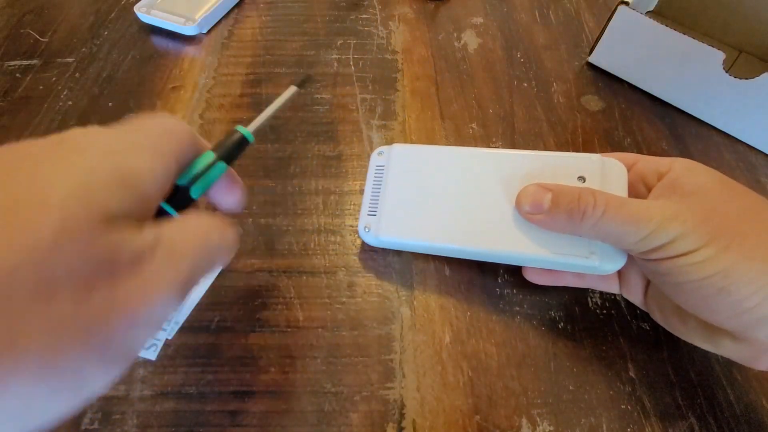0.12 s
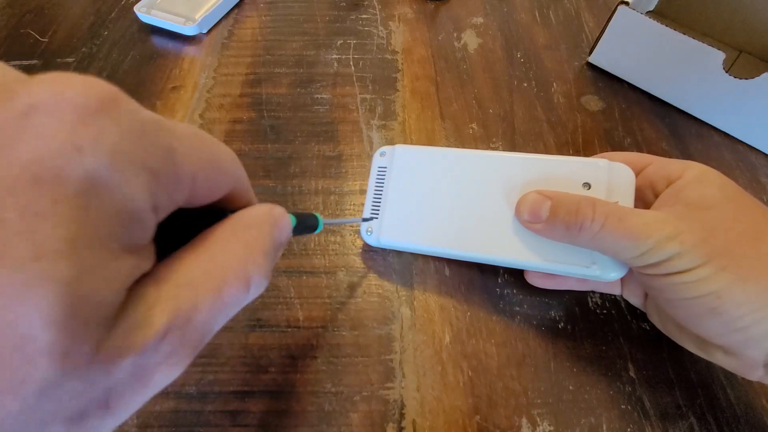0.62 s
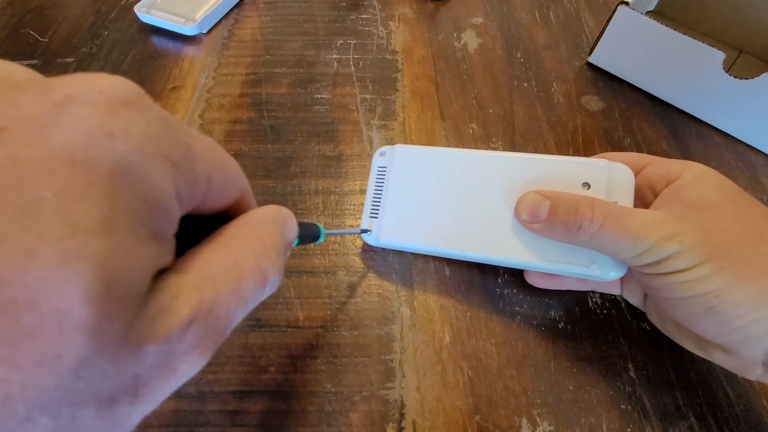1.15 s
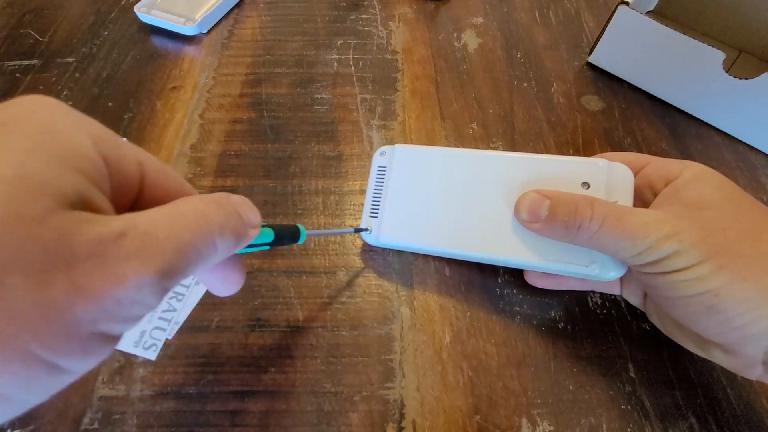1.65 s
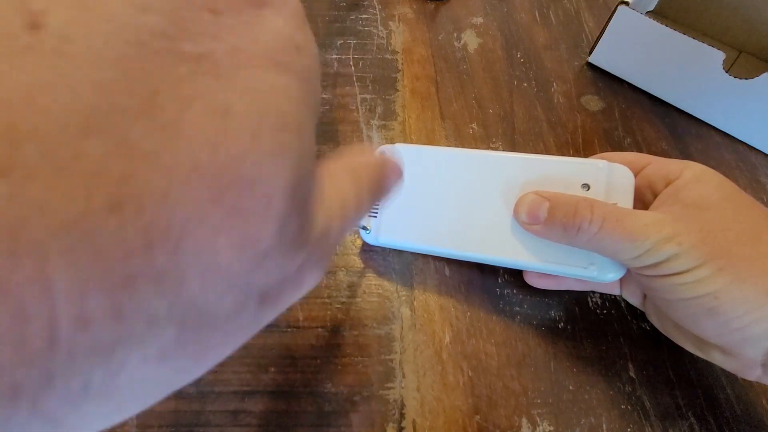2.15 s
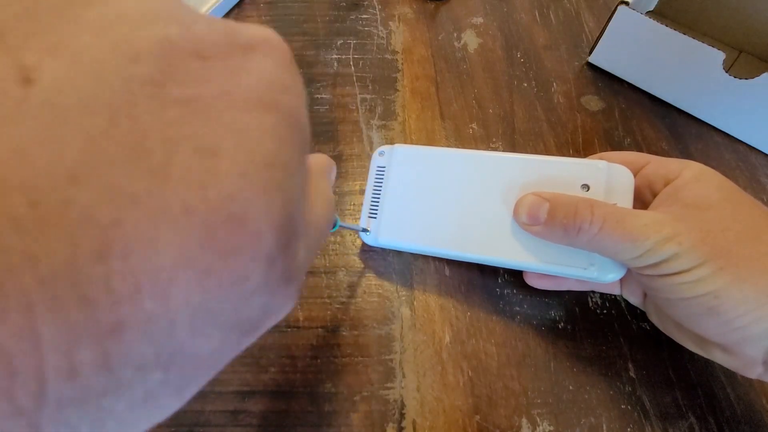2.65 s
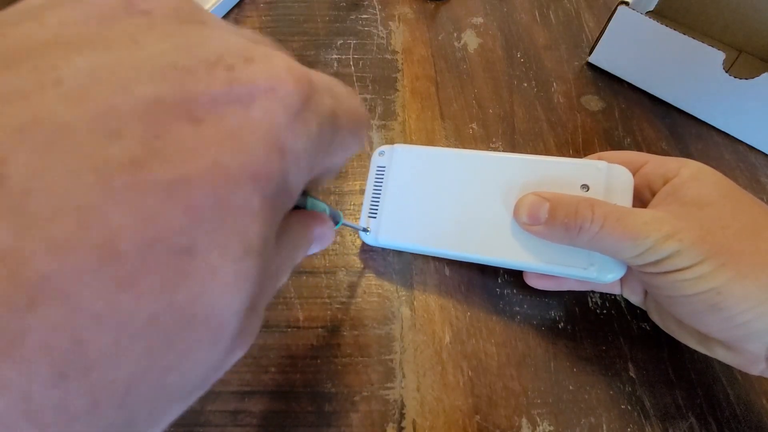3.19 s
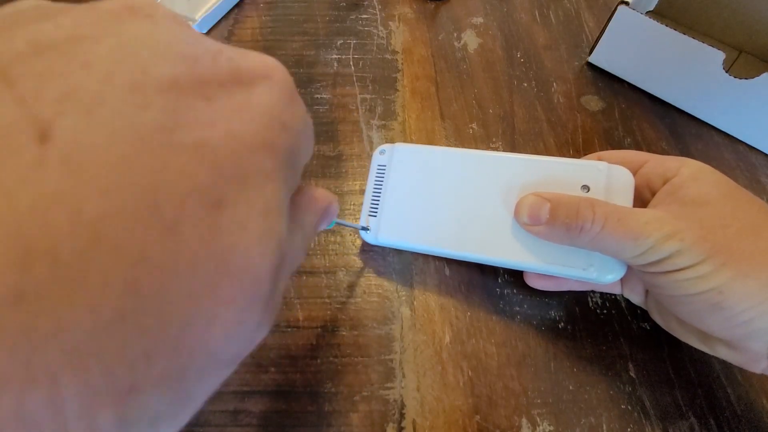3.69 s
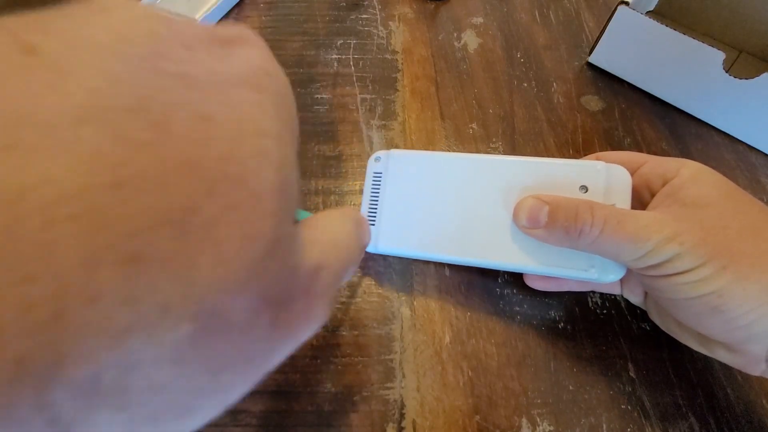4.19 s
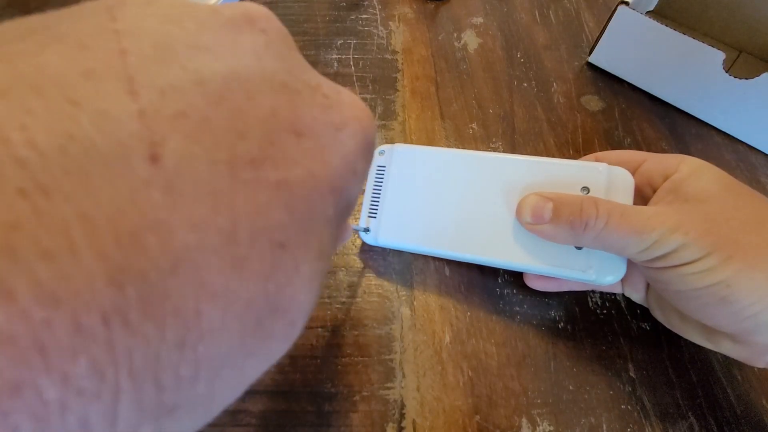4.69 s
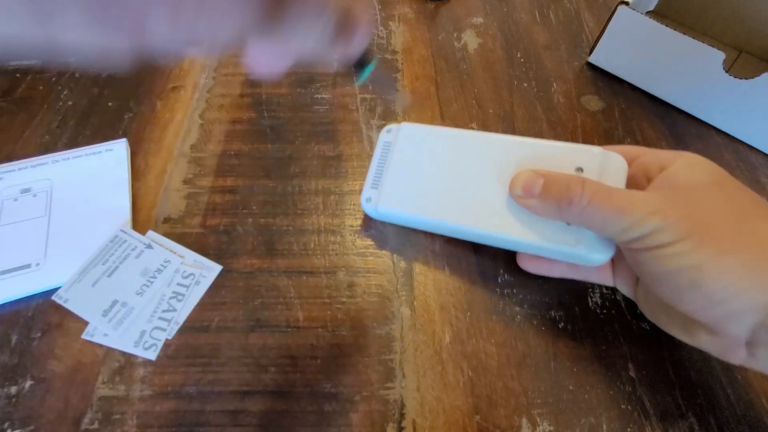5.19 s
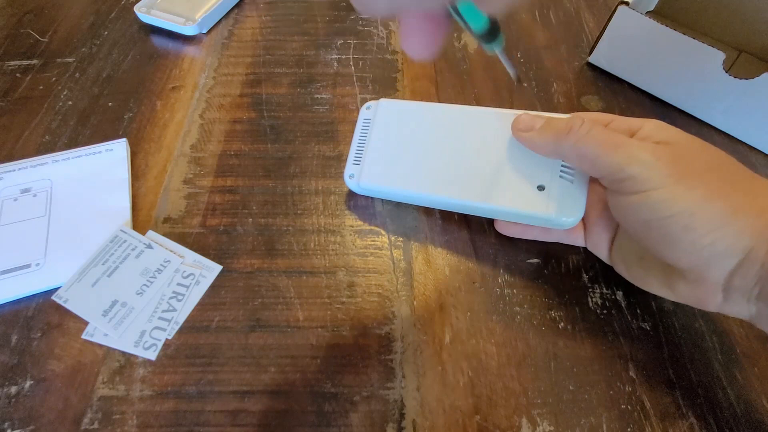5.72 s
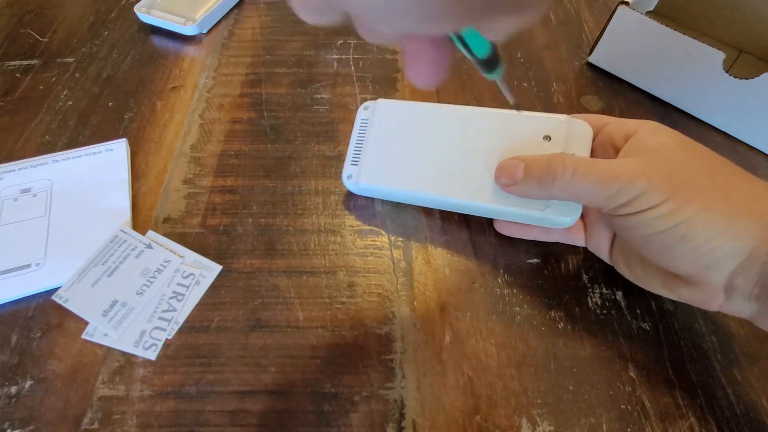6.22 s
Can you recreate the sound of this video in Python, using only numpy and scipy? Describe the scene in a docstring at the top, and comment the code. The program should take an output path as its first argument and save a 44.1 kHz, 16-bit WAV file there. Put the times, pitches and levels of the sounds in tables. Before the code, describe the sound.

A small screwdriver works a screw out of a hollow plastic case, heard very near. First a woody knock and a few steel ticks, then a pair of bright case clacks. Turning brings thin metallic scrapes, creaking threads, dull taps and light skin brushing. A crisp snap and the loudest thud on the table follow, with rough sliding and room ring, then small clicks amid soft hiss.

```python
"""Unscrewing a hollow plastic case

A wooden table in a lively room, two spaced microphones close by: a small screwdriver backs a screw out of the case.
Slips of steel on steel make the tip click and scrape; slips of the thread make the hollow case creak and tap.
Soft noise gives the fingers on the handle and the wide treble of some scrapes; as the tip snaps out, and in a few
harder knocks and one heavy blow, case and table ring as resonances. Low rumble and hiss, shaped noise, lie under all."""
import sys
import numpy as np
from scipy import signal
from scipy.fft import rfft, irfft, next_fast_len
from scipy.io import wavfile
from scipy.ndimage import uniform_filter1d, map_coordinates

SR = 44100
rng = np.random.default_rng(int(sys.argv[2]) if len(sys.argv) > 2 else 0)


def generate_wav(sig):
    """Save sig (samples, or channels by samples) to the path in sys.argv[1] as 16-bit PCM at SR."""
    pcm = np.round(np.clip(np.atleast_2d(sig).T, -1, 1) * 32767).astype(np.int16)
    wavfile.write(sys.argv[1], SR, pcm)


def volts(x):
    """Linear amplitude factor 10**(x/20) for a level x in dB, scalar or array-like."""
    e = np.asarray(x, float) / 20
    return 10 ** e


N = 279594


def unit(x):
    """Scale to rms 1."""
    return x / np.sqrt(np.mean(x ** 2) + 1e-20)


def along(points, hz):
    """Read (f/Hz, value) points on a log frequency axis."""
    f, value = np.transpose(points)
    return np.interp(np.log(hz + 1), np.log(f + 1), value)


def over_time(points):
    """Read (t/s, value) points at every sample."""
    return np.interp(np.arange(N) / SR, *np.transpose(points))


def strokes(rows, rise, fall):
    """One gain curve per row (t/s, level/dB, hold/s): a climb in dB per s, a hold from t, a fall in dB per s."""
    s, db, hold = np.array(rows)[:, :3].T[..., None]
    t = np.arange(0, N + 64, 32) / SR
    climb = rise * np.maximum(s - t, 0)
    decay = fall * np.maximum(t - s - np.abs(hold), 0)
    gain = uniform_filter1d(volts(db - climb - decay), size=9)  # rounds the corners over 6.5 ms
    return np.repeat(gain, 32, axis=1)[:, :N]


def wobble(rate):
    """A smooth random curve, rate knots a second."""
    knots = rng.standard_normal(int(N * rate / SR) + 4)
    return map_coordinates(knots, [np.arange(N) * rate / SR])


def filtered(x, response):
    """x times a complex response of frequency."""
    m = next_fast_len(x.shape[-1] + 8192)
    return irfft(rfft(x, m) * response(np.fft.rfftfreq(m, 1 / SR)), m)[..., :x.shape[-1]]


def modes(peaks, hz):
    """Causal sum of resonances (f/Hz, width/Hz, level/dB) that all start in step."""
    return sum(volts(db) * 1j * hz * w / (c * c - hz * hz + 1j * hz * w) for c, w, db in peaks)


def band(x, lo_hz, hi_hz):
    """Causal band-pass."""
    return signal.sosfilt(signal.butter(3, [lo_hz, hi_hz], "band", fs=SR, output="sos"), x)


def noise(spectrum, channels=1):
    """Coloured noise of rms 1, unrelated between channels."""
    white = rng.standard_normal((channels, N))
    return unit(filtered(white, lambda hz: volts(along(spectrum, hz))))


def slips(rate, spread_db):
    """Irregular tiny slips, about rate a second, of very uneven size; rms 1."""
    happens = rng.random(N) < rate / SR
    size = rng.standard_normal(N) * volts(spread_db * rng.standard_normal(N))
    return unit(happens * size)


def ears(x, scatter=0.28):
    """Two spaced microphones: above the bass they hear the sound over a quarter cycle apart, unevenly over frequency."""
    knots = rng.standard_normal(int(SR / 2 / 200) + 4)

    def phase(hz):
        turn = 0.9 + scatter * map_coordinates(knots, [hz / 500])  # radians each way, a knot every 500 Hz
        return turn * hz ** 2 / (hz ** 2 + 380 ** 2)

    return filtered(x, lambda hz: np.exp(1j * phase(hz) * [[1], [-1]]))


def chatter(t60, push=7):
    """Contact force: one sharp push, then rattle dying by 60 dB in t60 s."""
    t = np.arange(SR // 3) / SR
    rattle = rng.standard_normal(len(t)) * volts(-60 * t / t60) * (1 - np.exp(-t / 0.00016))
    return push * (t == 0) + rattle


def add(pair, s, parts, levels_db, pan_db):
    """Set each part to its peak level, lean it left by pan_db each way, and place the sum at both microphones."""
    lean = np.broadcast_to(pan_db, len(parts))
    hit = sum(volts(db + np.array([[side], [-side]])) * part / np.abs(part).max()
              for part, db, side in zip(parts, levels_db, lean))
    # 40 samples of lead leave space for what the phase turn spreads ahead of the hit
    pair[:, round(s * SR) - 40:][:, :hit.shape[1]] += ears(np.roll(hit, 40, axis=1))


# colour of the room's low rumble: f/Hz, level/dB (relative)
RUMBLE_COLOUR = [(12, -44), (20, 1), (45, -2), (82, -10), (150, -23.5), (178, -17.5), (200, -20.5),
                 (260, -26), (440, -120)]
# the rumble swells and sinks: t/s, level/dB (before its random lumps)
RUMBLE_LEVEL = [(0.0, -58.5), (1.25, -62), (1.73, -59.5), (2.31, -61.5), (2.81, -61), (3.07, -61.5),
                (3.34, -55.5), (3.669, -61.5), (4.17, -54.5), (5.08, -63), (5.16, -49.5), (5.53, -58.5),
                (5.72, -50.5), (5.881, -62), (5.979, -55), (6.34, -56)]
# colour of the hiss: f/Hz, level/dB (relative)
HISS_COLOUR = [(88, -58.5), (150, -17), (186, -18.5), (303, -8), (421, -10.5), (919, -19), (2790, -22),
               (3020, -20), (3320, -24.5), (3960, -25), (4540, -30), (7110, -33.5), (15600, -42),
               (16000, -78)]
# level of the steady soft noise, higher at the start and near 5.6 s: t/s, level/dB (before its random drift)
HISS_LEVEL = [(0, -61), (0.7, -71), (1.3, -70.5), (2.5, -67.5), (3.1, -67.5), (4.4, -68), (4.75, -73),
              (5.601, -64), (6.34, -70.5)]


def background():
    """Lumpy low noise, nearly alike in both microphones, and an unrelated hiss."""
    low = volts(over_time(RUMBLE_LEVEL) + 2.9 * wobble(7.7)) * noise(RUMBLE_COLOUR)
    odd = volts(-71) * noise(RUMBLE_COLOUR) * [[1], [-1]]  # the small part that differs
    drift = volts(1.2 * wobble(5))
    hiss = volts(over_time(HISS_LEVEL)) * drift * noise(HISS_COLOUR, channels=2)
    return low + odd + hiss


# how long the lively room rings: f/Hz, t60/s
ROOM_T60 = [(150, 1), (600, 0.45), (1100, 0.61), (2600, 0.41), (3600, 0.3), (7000, 0.16), (14000, 0.035)]


def room(x):
    """A diffuse noise tail, drawn anew every third of a second; each frequency dies at its own speed."""
    out, step = np.zeros((2, N + 2 * SR)), SR // 3
    for start in range(0, N, step):
        hz, t, z = signal.stft(rng.standard_normal((2, SR)), SR, nperseg=256)
        decay = volts(-60 * t / along(ROOM_T60, hz)[:, None])
        tail = signal.istft(z * decay, SR, nperseg=256)[1]
        tail = tail / np.linalg.norm(tail[0])
        wet = signal.fftconvolve(x[None, start:start + step], tail, axes=1)
        out[:, start + 200:][:, :wet.shape[1]] += wet  # the tail comes 200 samples late
    return out[:, :N]


# pushes on the table top: t/s, level/dB (before the slow onset)
THUDS_PUSHED = [(0.328, -42), (1.429, -59), (3.966, -55.5), (4.333, -59), (5.16, -41), (5.22, -33.5),
                (5.456, -48)]


def thuds():
    """The table top's lowest mode, 128 Hz, slow to start and slow to die."""
    out, t = np.zeros(N + SR), np.arange(SR // 2) / SR
    onset = 1 - np.exp(-t / 0.0045)
    for s, db in THUDS_PUSHED:
        decay = volts(db - 60 * t / 0.46)
        out[round(s * SR):][:len(t)] += decay * onset * np.sin(2 * np.pi * 128 * t)
    return out[:N]


# resonances of the wooden table top: f/Hz, width/Hz, level/dB (relative)
TABLE_MODES = [(225, 63, -5), (336, 7.7, -12), (382, 33, -5.5), (479.7, 29, -3), (517.7, 28, -4.5),
               (556, 18, -3), (604.6, 20, -0.5), (653, 41, -2), (718, 30, -12.5), (985, 130, -13.5),
               (1173, 120, -11.5), (1414, 210, -8.5), (1780, 170, -12), (2330, 240, -5), (2800, 170, 1.2),
               (3600, 270, -15), (6340, 2100, -11)]
# noisy ringing after the first knock, then bumps of the drag after the heavy blow:
# t/s, level/dB (before the shares of its parts), hold/s
SLIDE_BUMPS = [(0.335, -63, 0.023), (0.375, -63.5, 0.027), (5.2, -47.5, 0.013), (5.235, -46.5, 0.033),
               (5.285, -46, 0.048), (5.365, -45.5, 0.021), (5.41, -50, 0.0083), (5.44, -51.5, 0.012),
               (5.48, -57, 0.011), (5.52, -64.5, 0.0084)]
# note of the air gap under the dragged thing, narrowing upward: t/s, f/Hz
GAP_NOTE = [(5.2, 560), (5.35, 620), (5.501, 630)]
# colour of the drag: f/Hz, level/dB (relative)
DRAG_COLOUR = [(150, -41.5), (250, -37.5), (329, -5), (415, -12), (580, -13.5), (883, -9), (1210, 2.5),
               (1340, -3.5), (1470, 3.5), (2020, -1.5), (3300, -17), (4500, -30.5), (6200, -55.5),
               (8000, -63), (12000, -90), (16000, -110)]


def slide():
    """Gritty slips sound the table's modes and an air gap: noisy ringing after the first knock, later an uneven drag."""
    grit = np.array([slips(3000, spread_db=2), slips(3000, spread_db=2)])

    def surface(hz):
        return volts(along(DRAG_COLOUR, hz)) * (np.abs(modes(TABLE_MODES, hz)) + 0.089) ** 0.89

    drag = filtered(grit, surface)
    bumps = volts(3 * np.array([wobble(60), wobble(70)]))
    s, gap_hz = np.transpose(GAP_NOTE)
    t = np.arange(N) / SR
    gap = 0
    for share, note_hz in zip(np.eye(len(s)), gap_hz):  # crossfade from note to note
        note = unit(filtered(grit, lambda hz: modes([(note_hz, 90, 0)], hz)))
        gap = gap + np.interp(t, s, share) * note
    low = bumps[0] * (volts(2.5) * unit(band(drag, 280, 900)) + volts(-8.5) * gap)
    high = volts(-5.5) * bumps[1] * unit(band(drag, 980, 8000))
    return strokes(SLIDE_BUMPS, rise=760, fall=610).sum(axis=0) * (low + high)


# the hollow, wall, upper and crack ranges of a hit: low edge f/Hz, high edge f/Hz
HIT_RANGES = [(320, 900), (900, 2000), (2000, 5000), (5000, 15000)]


def knocks(events, body, t60, pans_db):
    """Each hit rings the body, its modes a little differently; its four ranges have their own strengths."""
    pair = np.zeros((2, N + SR))
    for s, db, hollow_db, wall_db, crack_db in events:
        detune = 1 + rng.standard_normal((len(body), 1)) * [0.012, 0, 0]
        relevel_db = rng.standard_normal((len(body), 1)) * [0, 0, 1.5]
        struck = np.array(body) * detune + relevel_db
        ring = filtered(chatter(t60), lambda hz: modes(struck, hz))
        levels_db = db + np.array([hollow_db, wall_db, 0, crack_db])
        add(pair, s, [band(ring, *edges) for edges in HIT_RANGES], levels_db, pans_db)
    return pair[:, :N]


# blows on the table, and at 5.1415 s the tip snapping out just before the heavy blow:
# t/s, upper level/dB, then relative to it: hollow level/dB, wall level/dB, crack level/dB
TABLE_HITS = [(0.3175, -30.5, 3.5, 6, -23), (0.3274, -44.5, -26, 18.5, -43), (0.3424, -55.5, 23, -9, -25),
              (5.1415, -29, -15, -2, 4), (5.1485, -29.5, 0, 2.5, -10.5), (5.1552, -14.5, 4.5, 3, -17.5),
              (5.1585, -26.5, 13, 3, -17.5), (5.1654, -30, -2, 5, -30), (5.1814, -36.5, 20, 15.5, -25.5),
              (5.1984, -49, 8, 18, -34), (5.2614, -47.5, 13.5, -3, -17.5), (5.2955, -41, -8, -4, -17),
              (5.444, -55, 20.5, 17, -22)]
# lean to the left, each way, of the four ranges: level/dB
TABLE_LEAN = [2.87, 0.3, 0.6, 2.5]


def table_knocks_and_snap():
    """Short contact forces ring the modes of the table top, for the blows and for the tip snapping out."""
    return knocks(TABLE_HITS, TABLE_MODES, 0.022, TABLE_LEAN)


# clacks of the case: t/s, upper level/dB, then relative to it: hollow level/dB, wall level/dB, crack level/dB
CASE_HITS = [(1.2164, -51, -13, -1.5, 8.5), (1.5341, -32, -1.5, 7, -2), (1.5594, -59.5, 20, -5.5, -9),
             (1.6512, -21, -17.5, -0.5, 6), (1.6542, -26.5, -1.5, 3.5, -4), (1.6623, -32.5, -8, 6.5, 3),
             (1.6792, -53.5, 13.5, 17.5, -16), (2.7187, -59, -5, 14.5, 4)]
# resonances of the struck case: f/Hz, width/Hz, level/dB (relative)
CASE_MODES = [(560, 42, -18), (560, 45, 8), (667, 37, -6), (956, 79, -7.5), (1069.6, 13.3, 0.5),
              (1075, 73, -14), (1400, 53, -9), (1820, 300, -28), (2210, 140, -10), (2480, 75, -14),
              (2660, 140, -9.5), (3670, 260, -14), (5550, 860, -27), (9460, 13000, -29)]
# lean to the left, each way, of the four ranges: level/dB
CASE_LEAN = [0.9, -0.3, 0.12, 1.6]


def case_clacks():
    """Short contact forces ring the modes of the plastic case."""
    return knocks(CASE_HITS, CASE_MODES, 0.025, CASE_LEAN)


# soft rushes: fingers along the handle, and the wide treble of some tip scrapes:
# t/s, level/dB (before flutter), hold/s, dull part level/dB (relative)
SOFT_RUSHES = [(1.417, -54.5, 0.044, -4), (1.525, -69, 0.0022, 15.5), (1.654, -56.5, 0.0046, -13),
               (2.052, -65, 0.004, 1.5), (2.193, -60, 0.06, -4), (2.491, -69, 0.013, 3.5),
               (2.735, -63.5, 0.084, 2), (2.88, -62.5, 0.0065, 0), (3.187, -76.5, .005, 10.5),
               (3.27, -74, 0.0041, 7.5), (3.815, -74.5, 0.045, 3), (4.107, -72, 0.077, 3),
               (4.251, -58, 0.046, -6.5), (4.37, -75, 0.023, 13), (4.913, -59, 0.066, -4.5),
               (5.136, -64, 0.011, 6)]
# a fingertip squeaks while brushing: t/s, level/dB, hold/s
SQUEAKS = [(4.25, -62.5, 0.045), (4.935, -56.5, 0.018)]
# colour of the soft rush: f/Hz, level/dB (relative)
RUSH_COLOUR = [(1470, -4), (2500, 0), (2960, -5), (4130, -0.5), (4560, -1), (10700, -5.5), (15600, -11),
               (16000, -58.5)]
# colour of the duller lower part: f/Hz, level/dB (relative)
DULL_COLOUR = [(470, -43.5), (800, -4), (951, -14.5), (1230, -7.5), (1360, -6.5), (1930, -7), (2800, -10),
               (3640, -13.5), (6160, -120)]


def soft_rushes():
    """Noise for skin on plastic and some scrapes' treble: wide, with a dull lingering part, a squeak and a low shake."""
    flutter = volts(1.6 * wobble(44))
    stroke = flutter * strokes(SOFT_RUSHES, rise=600, fall=162).sum(axis=0)
    dull_gain = volts(np.array(SOFT_RUSHES)[:, 3])
    heavy = flutter * (dull_gain @ strokes(SOFT_RUSHES, rise=600, fall=115))
    rush = stroke * noise(RUSH_COLOUR, channels=2) + heavy * noise(DULL_COLOUR, channels=2)
    white = rng.standard_normal((2, N))
    squeak = unit(filtered(white, lambda hz: modes([(1195, 120, 0)], hz) ** 2))
    squeak = strokes(SQUEAKS, rise=930, fall=360).sum(axis=0) * squeak
    shake = volts(-12.0) * stroke * unit(band(rng.standard_normal(N), 55, 190))
    return rush + squeak, shake


# resonances of the hollow case under the thread: f/Hz, width/Hz, level/dB (relative)
HOLLOW_MODES = [(573, 6.2, -5.5), (647.5, 54, -2), (776, 170, -16.5), (1048, 18, -11)]
# bursts of the thread creaking: t/s, level/dB (before the lean), hold/s
CREAK_BURSTS = [(1.96, -65, 0.018), (2.02, -61, 0.0074), (2.085, -60, 0.014), (2.338, -60.5, 0.0032),
                (2.438, -58.5, 0.022), (2.506, -58.5, 0.02), (2.72, -60.5, 0.016), (2.83, -58, 0.036),
                (2.87, -66, 0.0099), (2.91, -54.5, 0.034), (3.18, -57.5, 0.049), (3.29, -57, 0.033),
                (3.4, -54, 0.0045), (3.488, -47.5, 0.003), (3.53, -79, 0.011), (3.74, -67.5, 0.022),
                (3.765, -59, 0.0083), (3.846, -48, 0.0038), (4.012, -52.5, 0.0036), (4.045, -59, 0.013),
                (4.136, -49.5, 0.029), (4.184, -63, 0.0075), (4.42, -60, 0.013), (4.47, -64.5, 0.0045)]


def creak():
    """Stick-slip of the thread shakes the hollow case."""
    shaken = filtered(slips(2500, spread_db=3.5), lambda hz: modes(HOLLOW_MODES, hz))
    return strokes(CREAK_BURSTS, rise=1600, fall=370).sum(axis=0) * unit(band(shaken, 434.0, 1150))


# single slips of the thread: t/s, level/dB (before the lean), upper part level/dB (relative)
THREAD_TAPS = [(1.219, -50, -22), (2.017, -53.5, -3), (2.333, -51.5, -23), (2.432, -47, 1), (3.174, -55, 5),
               (3.399, -52, -20), (3.488, -35, -12), (3.531, -45, -6), (3.766, -57.5, 6), (3.844, -52, -15),
               (4.009, -39.5, -36), (4.042, -36.5, -30), (4.127, -48.5, 3), (4.173, -44.5, 2)]


def taps():
    """A larger slip of the thread knocks the hollow case softly."""
    pair = np.zeros((2, N + SR))
    for s, db, upper_db in THREAD_TAPS:
        ring = filtered(chatter(0.024, push=8.1), lambda hz: modes(HOLLOW_MODES, hz))
        parts = [band(ring, 340, 990), band(ring, 887, 1900)]
        add(pair, s, parts, [db, db + upper_db], pan_db=-1.5)
    return pair[:, :N]


# tip touching the screw head: t/s, level/dB (before the lean), ring f/Hz, crack level/dB (relative)
TIP_TICKS = [(0.4461, -52, 2380, 6), (0.4539, -38.5, 1880, -25), (0.5648, -35, 2850, -6),
             (0.66, -31.5, 2560, -26), (2.0578, -36, 3500, -26), (2.087, -43, 3320, -27),
             (2.5141, -29, 2500, -34), (5.6052, -48.5, 1175, -27.5), (5.6244, -36, 2800, -18),
             (5.737, -54, 2630, -6), (5.7565, -51, 4100, 0)]


def ticks():
    """The steel tip rings briefly on one focused pitch, with a dry crack above."""
    pair = np.zeros((2, N + SR))
    for s, db, ring_hz, crack_db in TIP_TICKS:
        force = chatter(0.0154, push=5.9)
        ring = filtered(force, lambda hz: modes([(ring_hz, 0.21 * ring_hz, 0)], hz) ** 2)
        add(pair, s, [ring, band(force, 3000, 8400)], [db, db + crack_db], pan_db=3.5)
    return pair[:, :N]


# tip scraping in the screw head: t/s, ring level/dB, hold/s, ring f/Hz, upper resonance level/dB (relative)
TIP_SCRAPES = [(0.067, -69.5, 0.0092, 4970, 3.5), (0.386, -61, 0.035, 2880, -13),
               (0.447, -45.5, 0.0058, 2480, -10), (0.644, -52, 0.018, 2830, -13),
               (0.662, -50.5, 0.021, 2660, -28), (1.949, -58.5, 0.015, 1700, -17),
               (2.057, -47, 0.041, 3600, -18), (2.471, -57.5, 0.024, 2280, -23),
               (2.503, -37.5, 0.015, 2760, -21), (2.827, -51, 0.044, 3150, -29),
               (2.877, -45, 0.033, 3490, -27), (3.214, -60, 0.03, 3550, -7),
               (3.273, -55.5, 0.02, 3420, -20), (3.299, -47, 0.0088, 3670, -11.5),
               (3.842, -59, 0.045, 3300, -13.5), (5.604, -65, 0.031, 2700, -3),
               (5.739, -64.5, 0.028, 3950, 0.5)]


def scrape():
    """Dense slips of steel on steel through a steep resonance set by how the tip sits, an upper one and a fine rasp."""
    grit = slips(12000, spread_db=2) * volts(2.5 * wobble(250))
    upper = unit(filtered(grit, lambda hz: modes([(5580, 960, 0)], hz) ** 2))
    upper = upper + volts(-12.0) * unit(band(grit, 3600, 10500))
    rasp = volts(-15.5) * unit(band(grit, 1870, 6040))
    out = np.zeros((2, N))
    for gain, (*_, ring_hz, upper_db) in zip(strokes(TIP_SCRAPES, rise=1780, fall=1220), TIP_SCRAPES):
        ring = unit(filtered(grit, lambda hz: modes([(ring_hz, 1000, 0)], hz) ** 2))
        out += ears(gain * (ring + rasp + volts(upper_db) * upper), scatter=0.3)
    return out


def scene():
    """Near sounds, their room and the background; the tip and the slide stir the room less than the rest."""
    rushes, shake = soft_rushes()
    creaking = ears(creak()) * volts([[2.2], [-2.2]])  # leans left
    bodies = table_knocks_and_snap() + case_clacks() + taps() + creaking + rushes
    tip_and_slide = ticks() + scrape() + slide()
    wet = room(volts(-12.5) * bodies[0] + volts(-20) * tip_and_slide[0])
    return bodies + tip_and_slide + wet + shake + thuds() + background()


def roll_off(x):
    """The treble ends steeply here."""
    return signal.sosfilt(signal.butter(12, 16440, fs=SR, output="sos"), x)


def record(dry):
    """Takes down the finished mix of the two microphones."""
    return roll_off(dry)


dry = scene()
out = record(dry)
generate_wav(out)
```